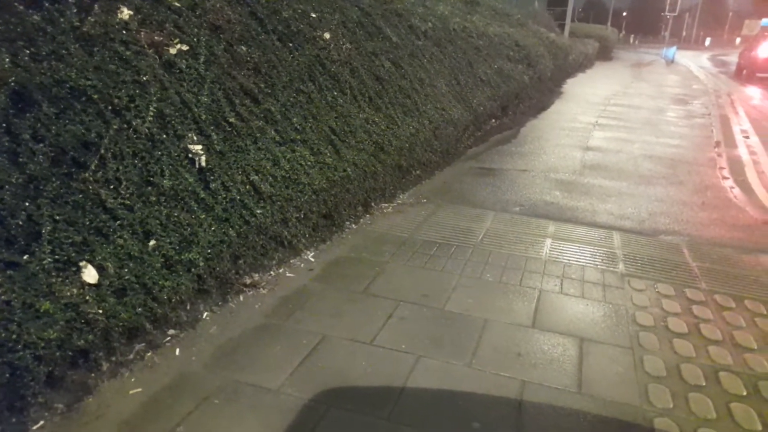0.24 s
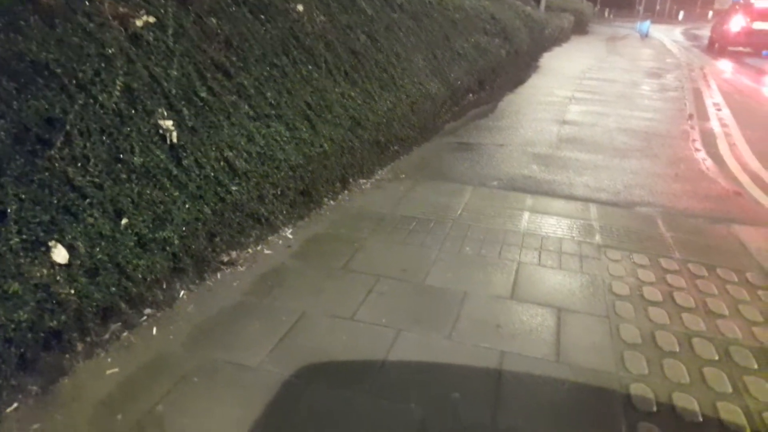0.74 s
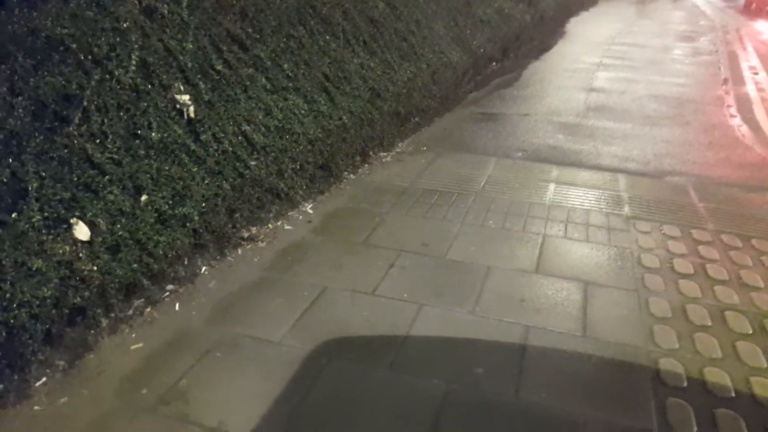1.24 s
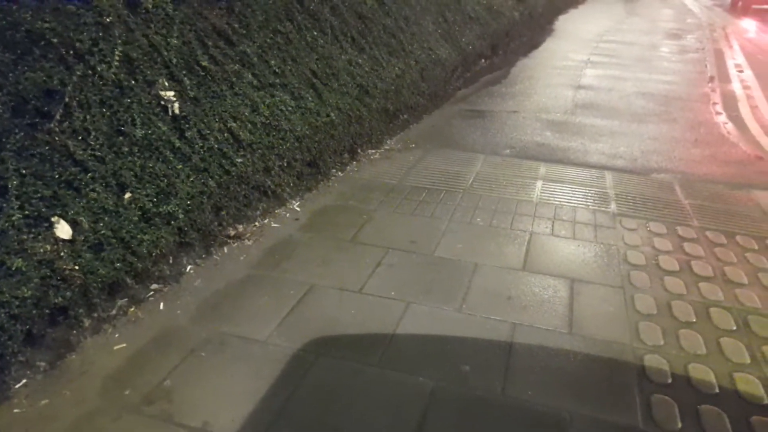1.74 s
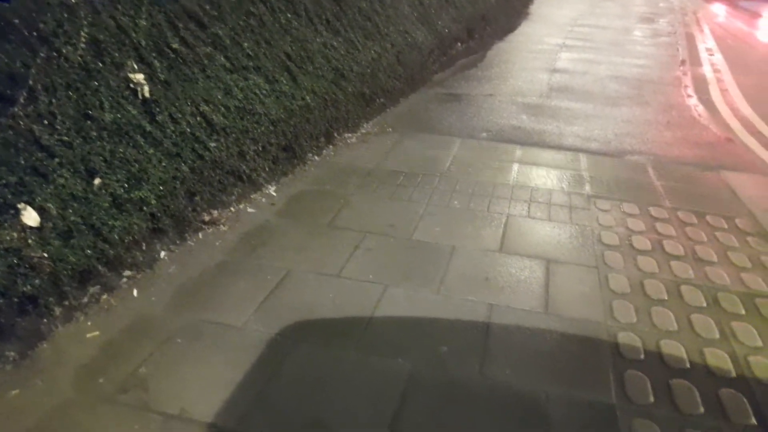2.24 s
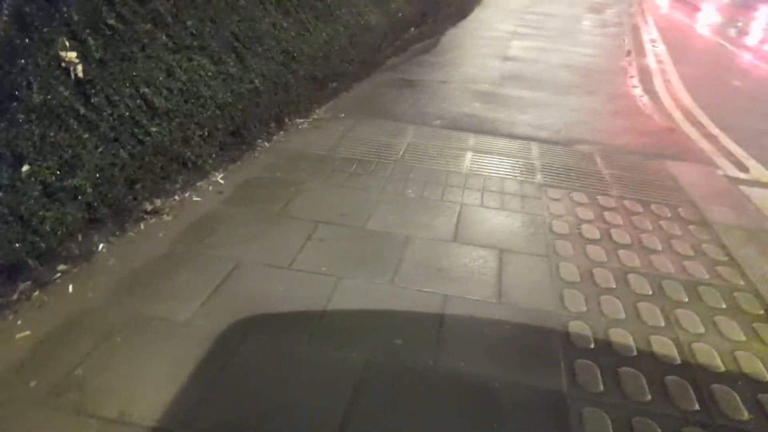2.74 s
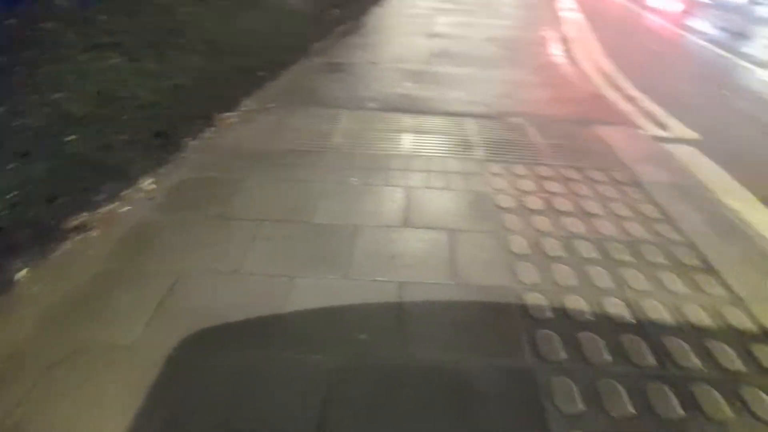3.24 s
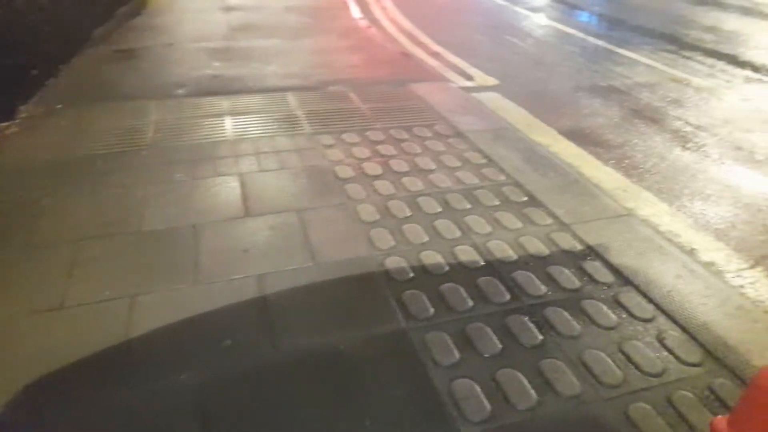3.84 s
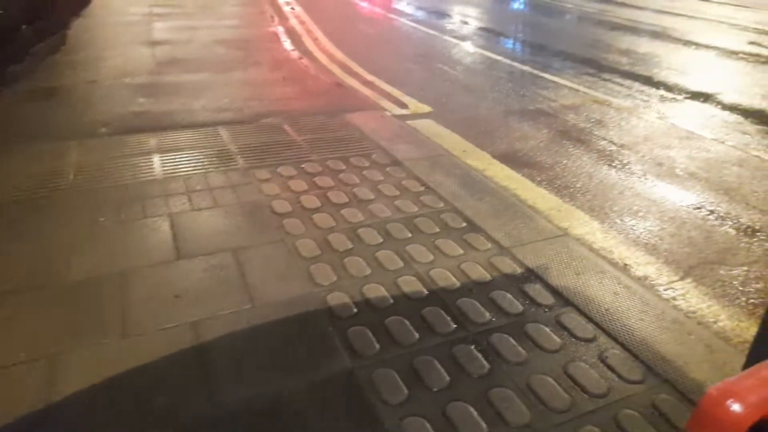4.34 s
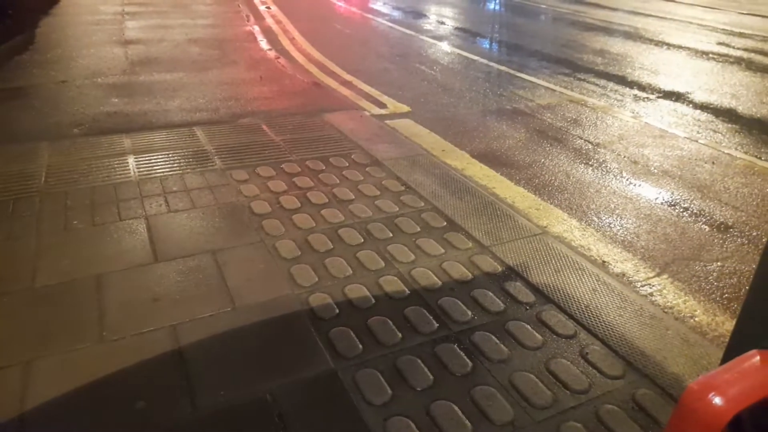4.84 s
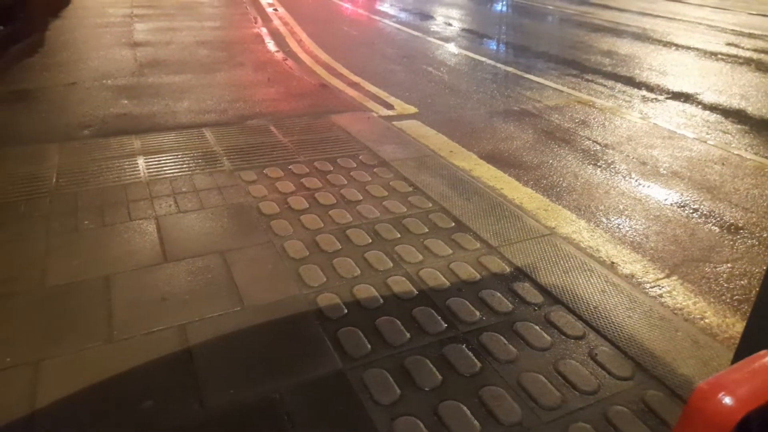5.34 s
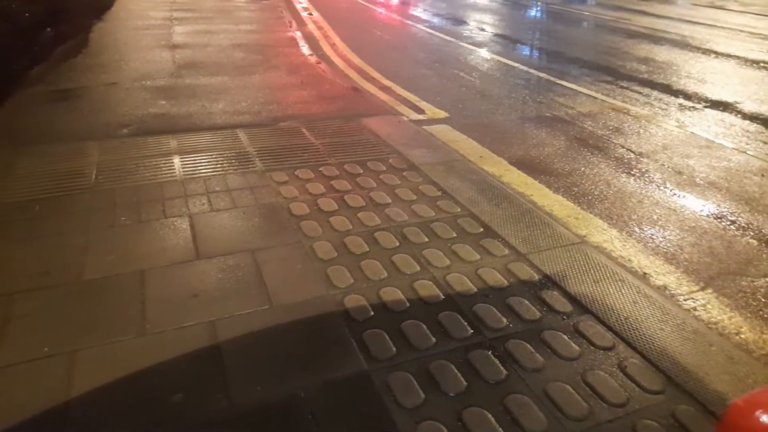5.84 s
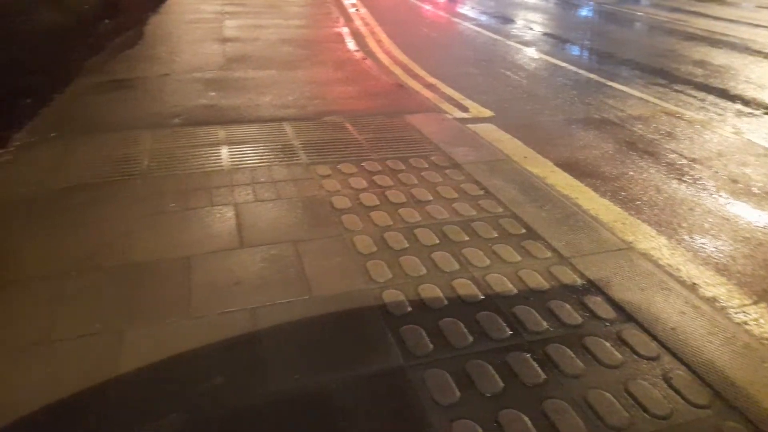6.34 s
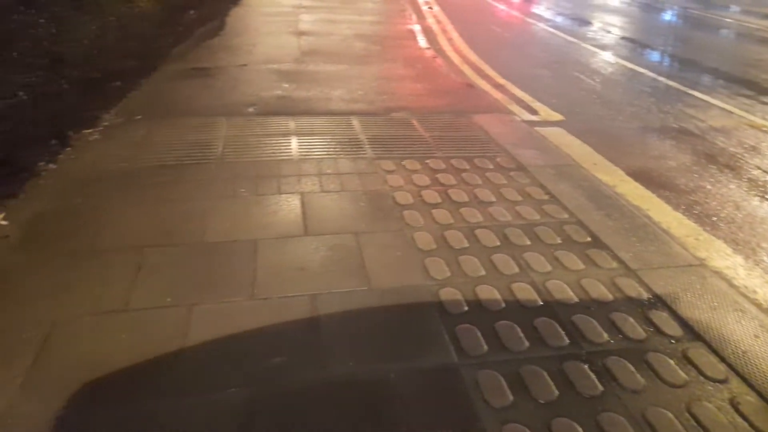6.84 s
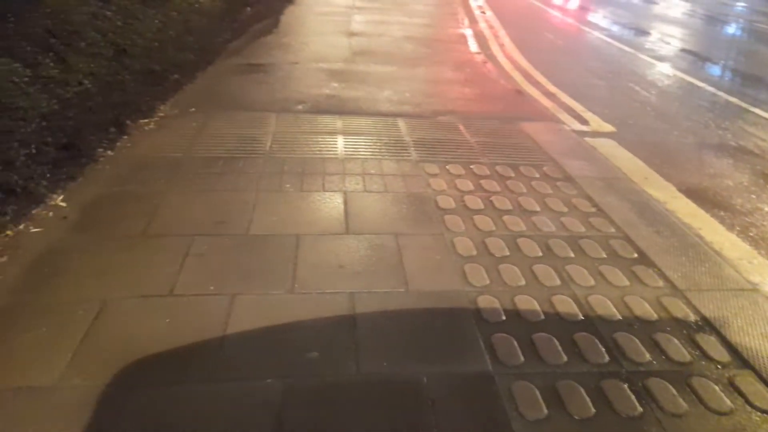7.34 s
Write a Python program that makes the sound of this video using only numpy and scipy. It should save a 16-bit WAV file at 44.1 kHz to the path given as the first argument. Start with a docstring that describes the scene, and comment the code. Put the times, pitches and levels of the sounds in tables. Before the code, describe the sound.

A wet street at night, heard outdoors from the pavement through a handheld stereo microphone. From the start, idling engines make a deep, uneven rumble with brief low throbs, strongest near 2.8 s, over a muffled drone of farther traffic. Soft tyre roar and hiss surround it, with very faint fine rain and a distant, wavering machine hum. Clothing rustles close at about 0.8 s; a tiny brake squeak follows at 1.4 s. Cars pass softly near 2.5 and 3.8 s. Sharper cloth rubs, zips and snaps, leaning right, come at 3.4-3.8 s. At 4.2 s a nearby vehicle pulls away with a lumpy shudder; its low exhaust boom climbs until 4.9 s, sags by 5.5 s, then climbs steadily. Tyres sing faintly through water around 6.3 s, another car washes past near 7 s, and the engine is still rising at the end, 7.6 s.

```python
"""A vehicle pulls away nearby from 4.2 s: gliding orders of its firing rate boom through fixed exhaust resonances.
The note climbs, sags as the clutch bites and climbs again. The place is a wet night street, heard from the
pavement beside a hedge: behind the vehicle, queued traffic rumbles and tyres hiss as shaped, patchy noise.
Fine rain falls as tiny random impacts. Close to the two microphone ports, rainproof clothing brushes a few times
in strokes of noise; faint tones add a distant machine, a brake squeak and a grainy, flickering high tone."""
import sys
import numpy as np
from scipy import signal
from scipy.fft import rfft, irfft, next_fast_len
from scipy.io import wavfile
from scipy.ndimage import uniform_filter1d, map_coordinates

SR = 44100
rng = np.random.default_rng(int(sys.argv[2]) if len(sys.argv) > 2 else 0)


def put_to_file(sound):
    """Save the sound as 16-bit audio at rate SR, in the file named by the first command-line argument."""
    columns = np.atleast_2d(sound).T  # one column per channel
    safe = np.clip(columns, -1, 1)
    whole_steps = np.round(safe * 32767)
    wavfile.write(sys.argv[1], SR, whole_steps.astype(np.int16))


N = 334697


def amp(db):
    """Decibels to gain."""
    return 10 ** (np.asarray(db) / 20)


def unit(x):
    """Scaled to rms 1."""
    return x / np.sqrt(np.mean(x ** 2) + 1e-20)


def along(points, hz):
    """(frequency [Hz], value) points read on a log frequency axis."""
    f, v = np.transpose(points)
    return np.interp(np.log(hz + 1), np.log(f + 1), v)


def curves(rows):
    """One value per sample for each column after the time."""
    s, *cols = np.transpose(rows)
    return [np.interp(np.arange(N) / SR, s, c) for c in cols]


def wobble(rate):
    """A smooth random curve, rate knots a second."""
    knots = rng.standard_normal(int(N * rate / SR) + 4)
    return map_coordinates(knots, [np.arange(N) * rate / SR])


def swell(s, half):
    """A bell-shaped rise and fall around time s; half is its standard deviation in seconds."""
    return np.exp(-.5 * ((np.arange(N) / SR - s) / half) ** 2)


def tone(hz, turns=1):
    """A sine of rms 1 at a multiple of a steady or gliding pitch, from a random phase."""
    cycles = turns * np.cumsum(hz * np.ones(N)) / SR
    return np.sqrt(2) * np.sin(2 * np.pi * (cycles + rng.random()))


def filtered(x, response):
    """x times a response of frequency."""
    m = next_fast_len(N + SR // 4)
    return irfft(rfft(x, m) * response(np.fft.rfftfreq(m, 1 / SR)), m)[..., :N]


def coloured(x, spectrum):
    """x given a spectrum, at rms 1."""
    return unit(filtered(x, lambda hz: amp(along(spectrum, hz))))


def narrow_swells(rows):
    """Each row is a narrow band of noise that rises and falls."""
    total = 0
    for s, db, half, centre, width in rows:
        def bell(hz):
            return np.exp(-.5 * (np.log2((hz + 1) / centre) / width) ** 2)
        band = unit(filtered(rng.standard_normal((2, N)), bell))
        total = total + amp(db) * swell(s, half) * band
    return total


def likeness(hz, spacing=0.17, shadow_hz=4200):
    """Sound from all round the horizon reaches two ports, spacing metres apart, with every delay that allows."""
    grid = np.linspace(0, SR / 2, 1024)
    bearings = np.linspace(-np.pi / 2, np.pi / 2, 96, endpoint=False)
    delays = spacing / 343 * np.sin(bearings)  # 343 m/s: speed of sound
    alike = np.cos(2 * np.pi * np.outer(grid, delays)).mean(axis=1)
    alike = alike * np.exp(-grid / shadow_hz)  # the ports agree less towards the treble
    return np.clip(1.065 * np.interp(hz, grid, alike), -1, 1)


def rush(spectrum, patchy_db):
    """Diffuse stereo noise of rms 1 with patches of random gain over time and frequency."""
    z = signal.stft(rng.standard_normal((2, N)), nperseg=512)[2]
    field = uniform_filter1d(rng.standard_normal(z.shape[1:]), size=5, axis=0)
    field = uniform_filter1d(field, size=18, axis=1)
    pair = signal.istft(z * amp(patchy_db * unit(field)), nperseg=512)[1][:, :N]

    def mid_side(hz):
        return amp(along(spectrum, hz)) * np.sqrt(1 + np.outer([1, -1], likeness(hz)))
    mid, side = filtered(pair, mid_side)
    return unit(np.array([mid + side, mid - side]))


def grains(rate, spread_db):
    """Tiny impacts, rate a second at random moments in each channel, mostly small and a few large."""
    hit = rng.random((2, N)) < rate / SR
    size_db = spread_db * np.minimum(rng.exponential(size=(2, N)), 4)
    return unit(hit * amp(size_db) * rng.choice([-1, 1], (2, N)))


# A faint machine hum down the road: (time [s], pitch before its waver [Hz], level [dB])
MACHINE_HUM = [(0, 519, -53), (1.2, 514.8, -45.5), (2.7, 508, -46), (3.8, 508, -54), (5, 505.4, -43.5),
               (6.2, 502.3, -45.5), (7.59, 493.1, -61)]


def whine(waver=0.00502):
    """A distant machine hums near 500 Hz and flutters, differently at each port, on its way over the street."""
    hz, db = curves(MACHINE_HUM)
    ports = []
    for _ in range(2):
        flutter = amp(2.5 * wobble(8))
        ports.append(unit(flutter * tone(hz * (1 + waver * wobble(14)))))
    return amp(db) * np.array(ports)


# One faint high tone: (time [s], bell spread [s], pitch before its waver [Hz])
FAINT_HIGH_TONE = (4.65, .7, 12880)


def high_tone(level_db=-82):
    """A very faint, grainy, flickering high tone near 12.9 kHz swells and fades; its pitch wavers fast."""
    s, half, hz = FAINT_HIGH_TONE
    return amp(level_db) * swell(s, half) * tone(hz * (1 + .005 * wobble(300)))


# One far brake squeak: (time [s], bell spread [s], pitch [Hz])
BRAKE_SQUEAK = (1.36, .025, 3601)


def squeak(level_db=-63):
    """A far brake squeaks once as a short pure tone, stronger at the right port."""
    s, half, hz = BRAKE_SQUEAK
    return amp([[level_db], [level_db + 4]]) * swell(s, half) * tone(hz)


# Cars going by on the wet road: (time when nearest [s], hiss [dB], roar [dB], time to half power [s])
CARS_PASSING = [(2.45, -55.5, -40, 0.63), (3.8, -55.5, -40.5, .4), (7.0, -51.5, -38, 0.74)]
FAR_HISS_DB, FAR_ROAR_DB = -56, -37  # the tyres of all the distant traffic


def tyres():
    """Gain of hiss and roar: distant traffic plus each passing car, whose power falls with distance squared."""
    t = np.arange(N) / SR
    near = 0
    for s, hiss_db, roar_db, half in CARS_PASSING:
        near = near + amp([[hiss_db], [roar_db]]) ** 2 / (1 + ((t - s) / half) ** 2)
    return np.sqrt(amp([[FAR_HISS_DB], [FAR_ROAR_DB]]) ** 2 + near)


# Idling queue and the farther engines: (time [s], level [dB])
QUEUE_LEVEL = [(0, -28.5), (2, -26), (2.85, -24), (3.15, -28), (3.9, -25.5), (4.7, -31), (7.59, -30)]
FAR_ENGINE_LEVEL = [(0, -31.5), (.8, -33), (1.7, -32), (3.6, -33), (5.7, -35.5), (7.1, -33.8), (7.59, -35)]
# Spectra of queue, farther engines, tyre roar, and wet hiss and rain: (frequency [Hz], relative density [dB per Hz])
QUEUE_SPECTRUM = [(20, -33.5), (32, -22.5), (45, -15), (62, 0), (80, -5), (98, -2), (125, -8), (160, -21),
                  (230, -29), (400, -52.5), (800, -100)]
FAR_ENGINE_SPECTRUM = [(60, -31.5), (130, -1), (190, 0), (240, -3), (315, 2.5), (420, -3.5), (640, -4),
                       (850, -10), (1300, -30.5), (3000, -65.5)]
TYRE_ROAR_SPECTRUM = [(250, -38), (600, -1.5), (900, 0), (1100, -2), (1350, -5.5), (1700, -7),
                      (2100, -12.5), (2550, -17.5), (3000, -22), (4500, -38.5), (8000, -68.5)]
WET_SPECTRUM = [(800, -19), (2200, 0), (3000, 3), (3900, 3), (4800, -1.5), (6300, -3), (7100, -11.5),
                (8300, -19.5), (9800, -18.5), (11500, -16), (15500, -19.5)]


def traffic():
    """Idling engines rumble, farther ones drone, and tyres roar and hiss on the wet road as cars go by."""
    queue_db, = curves(QUEUE_LEVEL)
    far_db, = curves(FAR_ENGINE_LEVEL)
    low = rush(QUEUE_SPECTRUM, patchy_db=-2.0)
    # the engines beat against each other but keep a fairly even strength
    strength = np.sqrt(np.abs(uniform_filter1d(low[0] ** 2, size=6500)) + 1e-3)
    rumble = amp(queue_db) * unit(low / strength)
    drone = amp(far_db) * rush(FAR_ENGINE_SPECTRUM, patchy_db=1.24)
    hiss_gain, roar_gain = tyres()
    roar = roar_gain * rush(TYRE_ROAR_SPECTRUM, patchy_db=0.74)
    hiss = hiss_gain * rush(WET_SPECTRUM, patchy_db=1.1)
    return rumble + drone + roar + hiss


# Brief swells in the rumble: (time [s], pitch [Hz], level before the overall trim [dB], bell spread [s])
RUMBLE_SWELLS = [(.19, 64, -19, 0.021), (0.566, 98, -20.5, 0.044), (0.964, 59, -20, 0.02),
                 (2.093, 66, -20, 0.016), (2.746, 68, -18, 0.029), (4.25, 55, -22.5, 0.044)]


def throbs(trim_db=-1):
    """The rumble gathers briefly into a low note."""
    notes = sum(amp(db) * swell(s, half) * tone(hz) for s, hz, db, half in RUMBLE_SWELLS)
    return amp(trim_db) * notes


# Tyres running through standing water:
# (time [s], peak level [dB], bell spread [s], centre [Hz], band spread [octaves])
WATER_SPRAYS = [(2.8, -53.5, 0.52, 2540, .1), (4.05, -52, 0.33, 2420, .12), (6.35, -43, 0.4, 1080, .06),
                (6.3, -48, .3, 1400, .12), (7.55, -67, .25, 11500, .35)]


def sprays():
    """Tyres sing for a moment in a narrow band as they cut through water."""
    return narrow_swells(WATER_SPRAYS)


def rain(level_db=-63):
    """Fine drops patter on the paving and the hedge."""
    return amp(level_db) * coloured(grains(rate=900, spread_db=7.0), WET_SPECTRUM)


# Strokes of cloth close to the ports: (time [s], level before the overall lift [dB], bell spread [s])
CLOTH_STROKES = [(0.767, -46, 0.055), (2.76, -68, 0.044), (3.164, -62, 0.034), (3.491, -51, 0.055),
                 (3.795, -47.5, 0.022)]
# Small snaps of the cloth: (time [s], onset level before the overall trim [dB])
CLOTH_SNAPS = [(0.7484, -42.5), (2.4175, -47.5), (3.4116, -35), (3.754, -36.5)]
# Spectrum of the rubbing: (frequency [Hz], relative density [dB per Hz])
CLOTH_SPECTRUM = [(500, -25), (1800, 11), (3000, 6), (4400, 6), (5000, 4.5), (5700, 8), (6400, 4.5),
                  (7200, 1), (9000, -4.5), (11500, 2), (14000, -0.5), (15700, 1)]


def clothing(lift_db=8, snap_trim_db=-1, snap_t60=.008):
    """Cloth slides in short strokes: countless threads catch and slip, now and then with a snap."""
    t = np.arange(N) / SR
    stroke = sum(amp(db) * swell(s, half) for s, db, half in CLOTH_STROKES)
    slips = amp(1.2 * wobble(220))
    threads = rng.standard_normal((2, N)) + .7 * grains(rate=900, spread_db=3.5)
    rub = coloured(unit(slips * threads), CLOTH_SPECTRUM)

    def right_lean(hz):
        left_minus_right_db = along([(2500, -0.5), (5000, -7.0), (9000, 0.0)], hz)
        return amp(np.outer([.5, -.5], left_minus_right_db))
    near_right = filtered(rub, right_lean)
    # each snap starts at once and falls 60 dB in snap_t60 seconds
    snaps = sum(amp(db - 60 * np.abs(t - s) / snap_t60) * (t >= s) for s, db in CLOTH_SNAPS)
    snap_spectrum = [(1000, -20), (4000, 1), (8500, -6.5), (12000, -3.5), (15700, -2), (18000, -41.0)]
    crack = coloured(rng.standard_normal((2, N)), snap_spectrum)
    return amp(lift_db) * stroke * near_right + amp(snap_trim_db) * snaps * crack


# Brief zips of the cloth:
# (time [s], peak level at the right before port colour [dB], bell spread [s], centre [Hz], band spread [octaves])
CLOTH_ZIPS = [(.79, -52, .02, 6000, .1), (3.49, -43, 0.0071, 4500, .09), (3.785, -55, .007, 5600, .07)]


def cloth_zips():
    """The cloth zips briefly in a narrow band, 4 dB weaker on the left before the ports' own colour."""
    return amp([[-4], [0]]) * narrow_swells(CLOTH_ZIPS)


# The departing engine's speed: (time [s], firing rate before a slight waver [Hz])
ENGINE_SPEED = [(4.2, 28.46), (4.45, 33.55), (4.7, 43.5), (4.92, 48.28), (5.23, 44.16), (5.52, 37.07),
                (5.71, 41.8), (5.99, 43.08), (6.58, 50.98), (7.03, 61.04), (7.13, 64.66), (7.59, 76.7)]
# The throttle opens, then the vehicle draws off: (time [s], gain [dB])
THROTTLE_GAIN = [(4.2, -7), (4.55, 2.5), (5.35, -1.5), (6.3, -0.8), (7.25, -1.5), (7.59, -3.5)]
# Engine orders: (multiple of the firing rate, level before pipe and throttle [dB])
ENGINE_ORDERS = [(1, -23), (2, -32.5), (3, -31), (4, -38), (5, -38.5), (6, -44)]
# The exhaust's fixed resonances; an order booms as it glides through one: (frequency [Hz], gain [dB])
EXHAUST_RESONANCES = [(30, -32), (57, -15), (64, 2), (76, 9), (85, -3), (91, 11), (95, 13), (103, 9.5),
                      (109, -3), (133, 5.5), (142, 4.5), (153, -3), (173, 4.5), (192, -5), (215, -3),
                      (300, -8)]
# Spectrum of the shudder: (frequency [Hz], relative density [dB per Hz])
JUDDER_SPECTRUM = [(40, -42), (75, -11), (98, -0.5), (120, -1), (150, 0), (180, -24.5), (300, -57.5),
                   (600, -120)]
LUG_HZ, LUG_WIDTH_HZ, LUG_DB = 37.25, 2.4, -26.5  # firing rate and its spread, level before throttle
JUDDER_S, JUDDER_HALF_S, JUDDER_DB = 4.33, .14, -28  # time, bell spread, level before throttle
JUDDER_HZ, JUDDER_DEPTH = 22.06, .6  # the shudder comes in quick lumps; rms depth


def vehicle(start=4.2, fade=0.036, flutter_db=2.13, lead=0.0004):
    """The silencer passes only the lowest orders of the firing rate; they glide together through its resonances."""
    firing_hz, = curves(ENGINE_SPEED)
    load_db, = curves(THROTTLE_GAIN)
    # near one low firing rate the labouring engine booms on its fourth order
    lugging = amp(LUG_DB) * np.exp(-.5 * ((firing_hz - LUG_HZ) / LUG_WIDTH_HZ) ** 2)
    firing_hz = firing_hz * (1 + .004 * wobble(20))
    boom = 0
    for order, db in ENGINE_ORDERS:
        order = round(order)
        resonance_db = along(EXHAUST_RESONANCES, order * firing_hz)
        gain = amp(db + resonance_db + flutter_db * wobble(16))
        boom = boom + gain * tone(firing_hz, order)
    labour = lugging * tone(firing_hz, 4)
    # uneven firing as the vehicle takes up the load
    lumps = 1 + JUDDER_DEPTH * tone(JUDDER_HZ)
    shudder = coloured(rng.standard_normal(N), JUDDER_SPECTRUM)
    judder = amp(JUDDER_DB) * swell(JUDDER_S, JUDDER_HALF_S) * lumps * shudder
    fade_in = np.clip((np.arange(N) / SR - start) / fade + .5, 0, 1)
    exhaust = amp(load_db) * fade_in * (boom + labour + judder)
    # the note reaches the left port lead seconds earlier
    return filtered(exhaust, lambda hz: np.exp(np.outer([1, -1], 1j * np.pi * hz * lead)))


def scene():
    """The street, the rain, the clothing and the departing vehicle."""
    street = whine() + high_tone() + squeak() + traffic() + throbs() + sprays()
    return street + rain() + clothing() + cloth_zips() + vehicle()


# The left microphone port against the right: (frequency [Hz], left minus right [dB])
PORT_DIFFERENCE = [(50, -4), (215, 0.3), (320, -3.5), (450, 0), (850, 0), (1400, -1.8), (2300, -1.5),
                   (2900, 0), (4000, -1.5), (4900, -3.5), (6200, -6.5), (7700, 5), (10500, -1),
                   (15000, -0.5)]
TOP_HZ = 15750  # band limit


def record(dry):
    """Each port has its own colour; nothing is kept above the band limit."""
    def port_response(hz):
        colour = amp(np.outer([.5, -.5], along(PORT_DIFFERENCE, hz)))
        return colour * (hz < TOP_HZ)
    return filtered(dry, port_response)


dry = scene()
out = record(dry)
put_to_file(out)
```